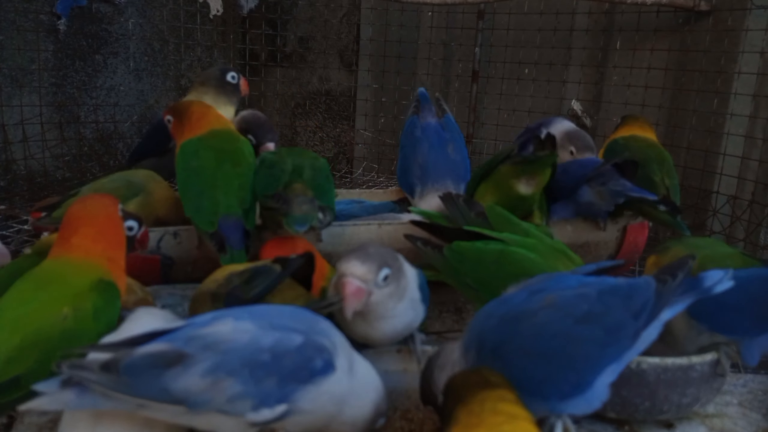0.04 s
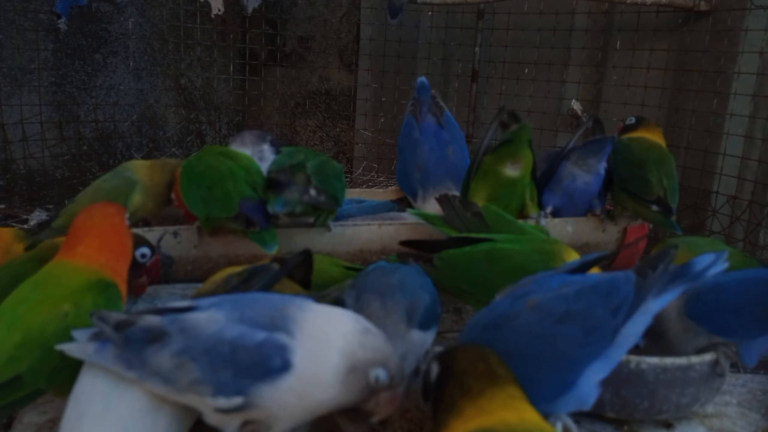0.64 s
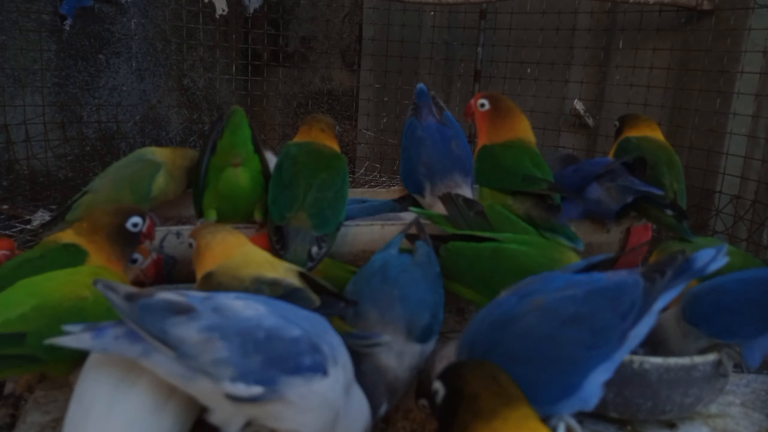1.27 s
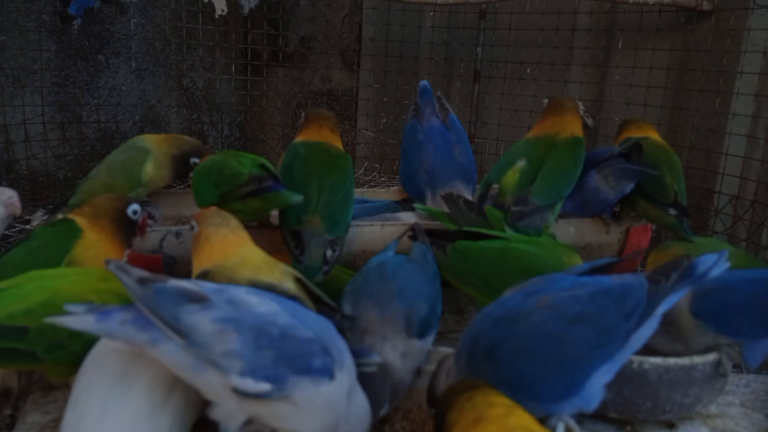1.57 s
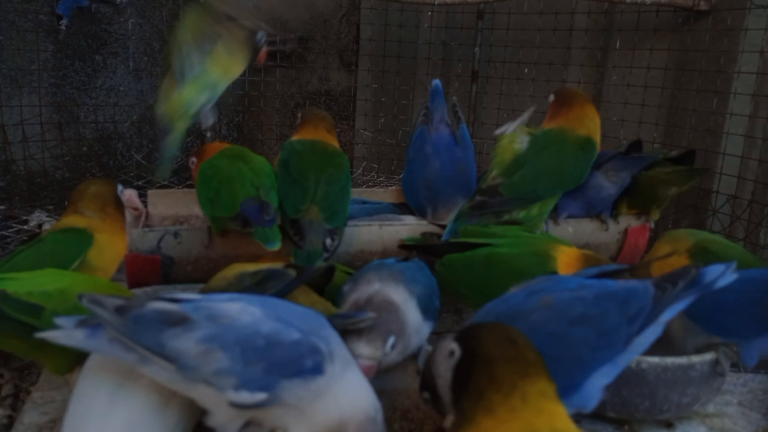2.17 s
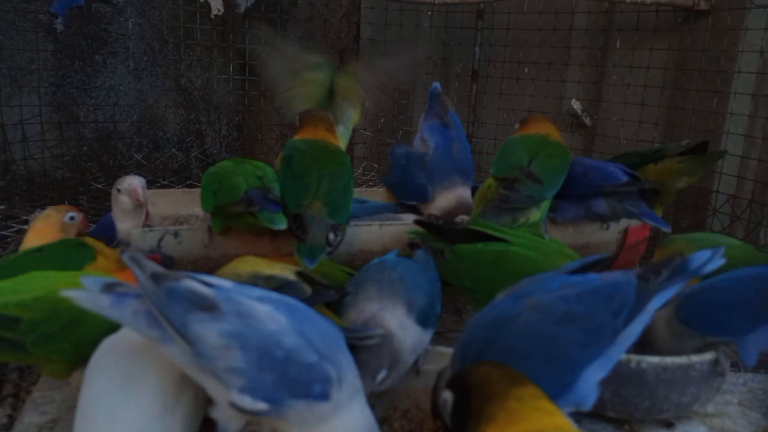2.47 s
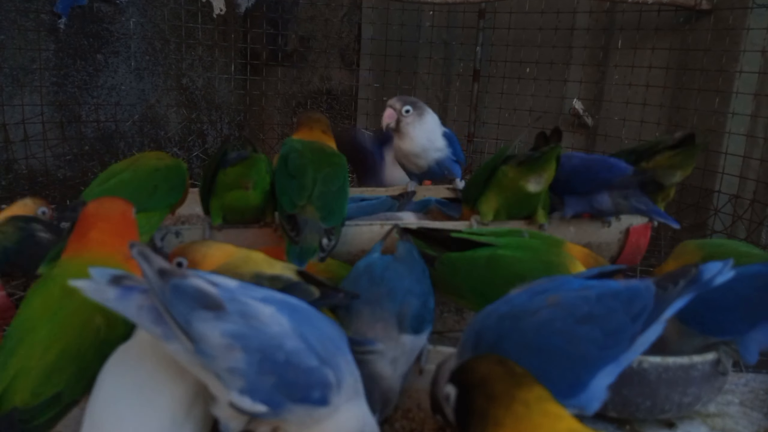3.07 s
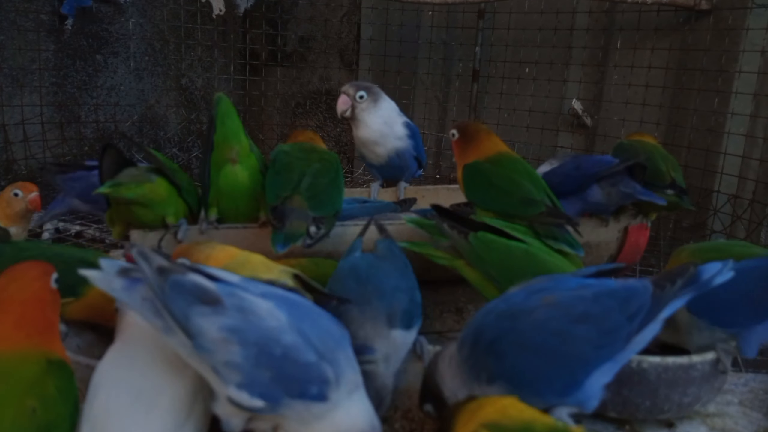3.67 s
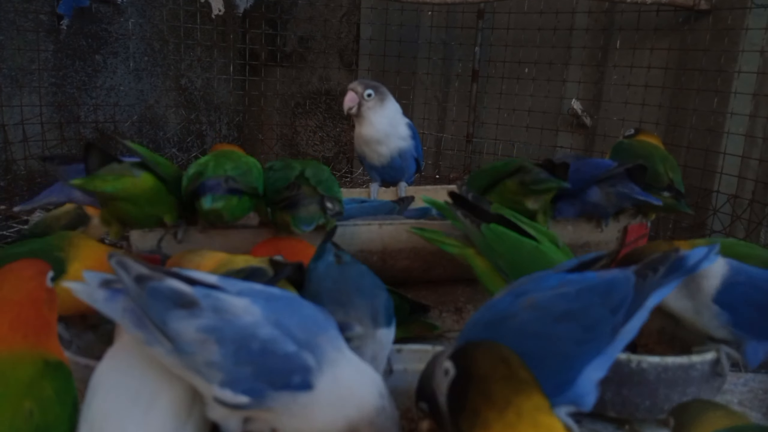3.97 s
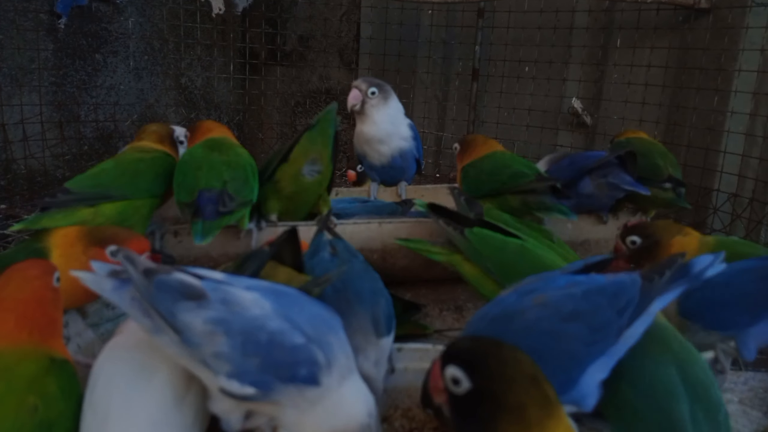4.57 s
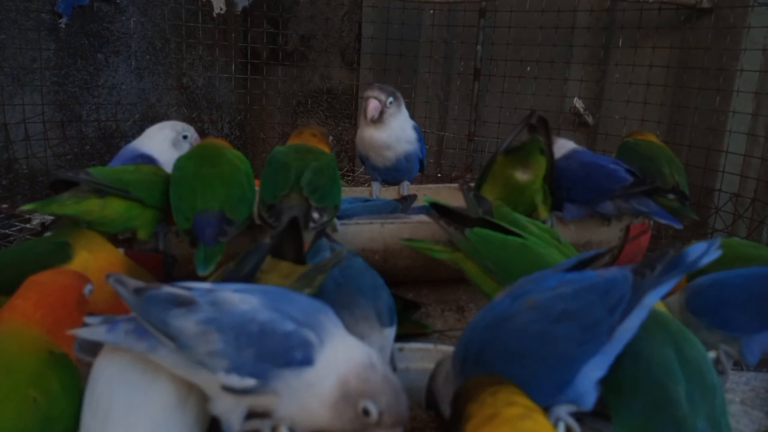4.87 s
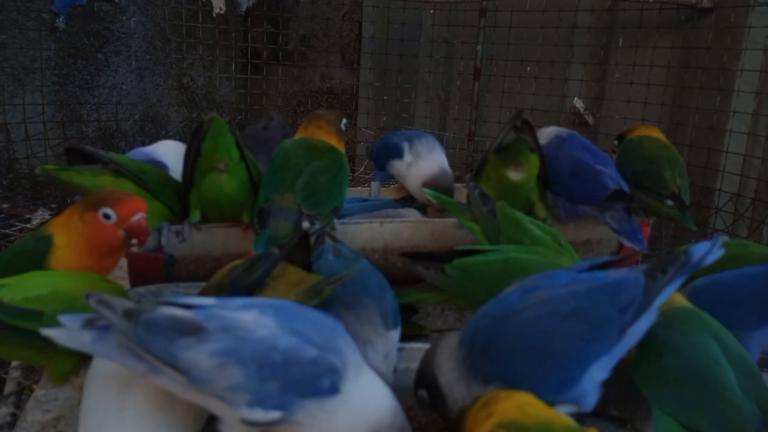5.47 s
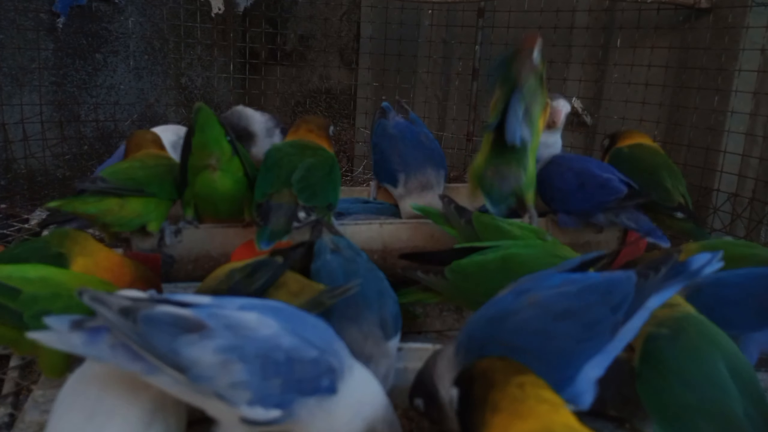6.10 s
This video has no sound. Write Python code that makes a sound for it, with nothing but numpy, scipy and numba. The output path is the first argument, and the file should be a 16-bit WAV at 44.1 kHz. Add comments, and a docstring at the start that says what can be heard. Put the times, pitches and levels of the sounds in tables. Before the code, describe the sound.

Close pecking, claw scrapes and dull knocks on a perch mix with the rustle and flutter of small parrots jostling at a feeder. A piercing, raspy shriek breaks out, followed by a quick rising chirp, a squawk and a softer chirp, then two more bursts of shrieking. The calls ring off the aviary walls and briefly overload the microphone. Behind them are a low steady hum and two faint, hoarse faraway calls.

```python
"""Feathers rustle, feet shuffle and wings push air as lovebirds feed close by, over a faint outdoor hum.
Beaks crack seed, claws scrape, perch and feeder knock. Three shrieking phrases, a lone squawk and two
rising chirps come from the syrinx, a harmonic stack that jumps between clean and rasping notes, and ring
off the walls of a small aviary. A dry, low crackle of microphone overload is added at four loud moments.
Another bird calls hoarsely, far off. A gain control ducks under each shriek."""
import sys
import numpy as np
from scipy import signal
from scipy.fft import rfft, irfft, next_fast_len
from scipy.io import wavfile
from scipy.ndimage import uniform_filter1d
from numba import njit

SR = 44100
rng = np.random.default_rng(int(sys.argv[2]) if len(sys.argv) > 2 else 0)


def persist_wave(psi):
    """Save psi, clipped to +-1, as 16-bit WAV."""
    counts = np.round(np.clip(psi, -1, 1) * 32767).astype(np.int16)
    wavfile.write(sys.argv[1], SR, np.atleast_2d(counts).T)


N = 279594
TIME = np.arange(N) / SR
TOP_HZ = 16200


def undb(db):
    """Decibels to gain."""
    return 10 ** (np.asarray(db) / 20)


def unit(x):
    """Scale to rms 1."""
    return x / np.sqrt(np.mean(x ** 2) + 1e-20)


def add(out, start_s, x):
    """Mix x into out from start_s."""
    i = int(start_s * SR)
    out[i:i + len(x)] += x[:N - i]


def spectrum_db(hz, points):
    """Read (Hz, dB) points on a log-frequency axis."""
    points_hz, db = np.transpose(points)
    return np.interp(np.log(hz + 1), np.log(points_hz), db)


def colour(x, points):
    """Filter by (Hz, dB) points; rms 1."""
    size = next_fast_len(len(x))
    gain = undb(spectrum_db(np.arange(size // 2 + 1) * SR / size, points))
    return unit(irfft(rfft(x, size) * gain, size)[:len(x)])


def band(x, low_hz, high_hz, order=2):
    """Causal band-pass."""
    sos = signal.butter(order, [low_hz, min(high_hz, SR / 2 - 100)], "band", fs=SR, output="sos")
    return signal.sosfilt(sos, x)


def wander(t, rate_hz):
    """Random values joined by lines."""
    steps = rng.standard_normal(4096)
    return np.interp(t * rate_hz, np.arange(len(steps)), steps)


def gate(t, length_s, edge_s):
    """Fade in from 0 and out from length_s, each over edge_s."""
    return np.sin(np.pi / 2 * np.clip(np.minimum(t, length_s + edge_s - t) / edge_s, 0, 1)) ** 2


def decay(t, t60_s):
    """Fall by 60 dB every t60_s."""
    return np.exp(-np.log(1000) * t / t60_s)


def grains(spread_db, size=N):
    """Noise of tiny contacts of very unequal strength."""
    noise = rng.standard_normal(N)
    strength = undb(spread_db * np.minimum(rng.exponential(size=N), 2 * np.pi))
    return unit(noise * strength)[:size]


def activity(calm_db, movements, attack_s=0.011, release_s=0.02):
    """Envelope of (start s, hold s, dB) movements above a calm level."""
    power = undb(calm_db) ** 2
    for start_s, hold_s, db in movements:
        t = TIME - start_s
        burst = np.clip(t / attack_s, 0, 1) * np.exp(-np.maximum(t - hold_s, 0) / release_s)
        power = power + (undb(db) * burst) ** 2
    return np.sqrt(power)


def cracks(count=260, spread_db=4.5, decay_s=0.012):
    """Envelope of small cracks: instant onset, fast decay; a few stand out."""
    kicks = np.zeros(N)
    for when, draw in rng.random((count, 2)):
        kicks[int(when * N)] += undb(spread_db * np.minimum(-np.log(draw), np.pi))
    return signal.lfilter([1], [1, -np.exp(-1 / (decay_s * SR))], kicks)


# Spectra of feathers and of feet. Each row: frequency in Hz, gain in dB.
FEATHER_SPECTRUM = [(1290, -83), (2200, 7.5), (3330, -0.5), (4000, 3.5), (4720, 2), (6640, -1), (9250, 4.5),
                    (11100, -1), (15000, -6.5), (16000, -27)]
FOOT_SPECTRUM = [(240, -21), (400, -17), (602, 2), (782, -0.5), (860, 6), (1100, 6.5), (1210, 0),
                 (1410, 6.5), (1800, -0.5), (3200, -5), (4160, -21), (7040, -120)]
# Birds jostling. Each row: start in seconds, hold in seconds, relative feather and foot levels in dB.
JOSTLES = [(0, 0.13, -44.5, -38), (0.16, 0.3, -45, -44), (1.602, 0.15, -57.5, -48),
           (1.88, 0.15, -46.5, -38.5), (2.18, 0.073, -46, -52), (2.425, 0.25, -45, -43.5),
           (2.769, 0.074, -41.5, -46.5), (2.974, 0.042, -34, -39), (3.087, 0.057, -43.5, -40.5),
           (3.591, 0.066, -40, -43.5), (4.049, 0.083, -45.5, -46.5), (4.266, 0.065, -46, -48),
           (4.671, 0.049, -42, -38.5), (4.819, .09, -44.5, -40.5), (5.25, .18, -46, -39.5),
           (5.454, 0.046, -43, -49.5), (5.838, 0.19, -42, -41.5), (6.16, 0.22, -53.5, -46.5)]


def jostling(gain_db=-2, calm_feathers_db=-54, calm_feet_db=-50, surge_db=5.5, husks=0.79, steps=0.41):
    """Husks crack over rustling feathers and shuffling feet, which surge together."""
    surge = undb(surge_db * wander(TIME, 45))
    feathers = unit(colour(grains(3.6), FEATHER_SPECTRUM) * (surge + husks * cracks()))
    feet = unit(colour(grains(3.33), FOOT_SPECTRUM) * (surge + steps * cracks()))
    rustling = activity(calm_feathers_db, [(start_s, hold_s, db) for start_s, hold_s, db, _ in JOSTLES])
    stepping = activity(calm_feet_db, [(start_s, hold_s, db) for start_s, hold_s, _, db in JOSTLES])
    return undb(gain_db) * (rustling * feathers + stepping * feet)


# Spectrum of air pushed by wings. Each row: frequency in Hz, gain in dB.
DRAUGHT_SPECTRUM = [(18, -43), (30, -13), (81, 1.5), (165, -2.5), (231, -10.5), (392, -8), (523, -12),
                    (600, -8.5), (780, -50), (1320, -120)]
# Take-offs and landings. Each row: start in seconds, hold in seconds, relative level in dB.
FLAPS = [(-.02, .4, -41.5), (1.6, 0.8, -45.5), (2.8, .06, -36), (4.85, 0.273, -45), (5.86, 0.15, -39)]


def wing_draught(gain_db=-3, calm_db=-49.5, gust_db=5.5):
    """Wings push air in low gusts."""
    air = colour(rng.standard_normal(N), DRAUGHT_SPECTRUM)
    gusts = unit(air * undb(gust_db * wander(TIME, 30)))
    return undb(gain_db) * activity(calm_db, FLAPS) * gusts


# Spectrum of the outdoor hum. Each row: frequency in Hz, gain in dB.
HUM_SPECTRUM = [(18, -36), (30, -55), (70, -3), (153, 4.5), (336, -4.5), (780, -4), (1070, -3.5),
                (1220, -8), (1430, -2.5), (3770, -18.5), (7670, -24), (9460, -10.5), (14800, -49),
                (16000, -25)]
# Drone outside. Each row: pitch in Hz, level in dB.
DRONE_TONES = [(168, -61), (266, -60.5)]


def outdoor_hum(level_db=-51, waver=0.011, swell_db=3.5):
    """Low noise with a faint wavering drone in it."""
    hum = colour(rng.standard_normal(N), HUM_SPECTRUM) * undb(level_db + wander(TIME, 3.57))
    for hz, db in DRONE_TONES:
        phase = 2 * np.pi * np.cumsum(hz * (1 + waver * wander(TIME, 12))) / SR
        hum += undb(db + swell_db * wander(TIME, 2.79)) * np.sin(phase)
    return hum


# Pecks. Each row: start in seconds, relative level in dB, relative body level in dB, T60 in seconds.
BEAK_PECKS = [(.0678, -26.5, -1.5, .07), (0.2094, -30, -16, 0.043), (.631, -33.5, 7.5, 0.049),
              (.7324, -25.5, -20, 0.012), (1.4436, -39, 1, 0.036), (1.6974, -38, 13.5, 0.2),
              (1.7723, -32, 7.5, 0.069), (2.334, -32.5, -16, 0.1), (2.4056, -32, 11.5, 0.068),
              (2.6101, -22, 2.5, 0.056), (4.0424, -44, 9, 0.05), (4.1904, -46.5, 17.5, 0.075),
              (4.3776, -26.5, -19, 0.022), (4.547, -34.5, 0, 0.017), (4.9873, -37, 8, 0.025)]


def pecks(gain_db=-7, body_gain_db=-4):
    """A beak hits seed or trough: a sharp crack with a woody body."""
    out, t = np.zeros(N), TIME[:SR // 4]
    for start_s, db, body_db, t60_s in BEAK_PECKS:
        crack = unit(band(grains(3, size=len(t)), 2500, 12000, order=1))
        body = undb(body_db + body_gain_db) * unit(band(rng.standard_normal(len(t)), 980, 2500))
        add(out, start_s, undb(db + gain_db) * (crack + body) * decay(t, t60_s))
    return out


# Spectrum of a scrape. Each row: frequency in Hz, gain in dB.
SCRAPE_SPECTRUM = [(290, -34), (500, -6), (868, -10), (1190, -3), (1400, 10), (1570, 1.5), (3860, 0),
                   (4730, -6), (9490, -1.5), (16000, -25)]
# Scrapes. Each row: start in seconds, fade time in seconds, level in dB, tilt in dB per octave.
CLAW_SCRAPES = [(0.401, 0.025, -39, -2.5), (2.803, 0.02, -40, 1.5), (3.81, 0.018, -43.5, -2.5),
                (4.684, 0.036, -38, 1), (5.229, .016, -36, 1.5), (5.317, 0.054, -38.5, 1),
                (6.081, 0.039, -31.5, 5)]


def scrapes(attack_s=0.0015, flicker_db=1.5):
    """Claws and wing tips drag grittily over wood and wire."""
    out, t = np.zeros(N), TIME[:SR // 4]
    for start_s, fade_s, db, tilt_db in CLAW_SCRAPES:
        tilted = [(hz, gain_db + tilt_db * np.log2(hz)) for hz, gain_db in SCRAPE_SPECTRUM]
        grit = colour(grains(2.5, size=len(t)), tilted) * undb(flicker_db * wander(t, 250))
        envelope = (1 - np.exp(-t / attack_s)) * np.exp(-(t / fade_s) ** 2 / 2)
        add(out, start_s, undb(db) * grit * envelope)
    return out


# Response of throat and beak. Each row: frequency in Hz, gain in dB.
VOICE_SPECTRUM = [(900, -87), (1500, -9), (2200, 2.5), (3200, 3.5), (6500, 2.5), (9500, 6.5), (12000, -2.5),
                  (14000, -15), (16000, -24)]


def syrinx(hz, rasp, throat_hz, tilt_db, throat_db=10, throat_octaves=0.39, swell_db=4, edge_s=0.0014):
    """Harmonic stack, tilted per octave; rasp scatters pitch and strength and weakens alternate cycles."""
    t = TIME[:len(hz)]
    jitter = rasp * (0.0935 * wander(t, 900) + 0.06 * wander(t, 250))
    phase = 2 * np.pi * np.cumsum(hz * (1 + jitter)) / SR
    k = np.arange(1, 12)[:, None]
    octaves = np.log2(k * hz / throat_hz)
    resonance_db = throat_db * np.exp(-(octaves / throat_octaves) ** 2)
    harmonics_db = spectrum_db(k * hz, VOICE_SPECTRUM) + tilt_db * octaves + resonance_db
    tone = unit(np.sum(undb(harmonics_db) * (k * hz < TOP_HZ) * np.sin(k * phase), axis=0))
    shimmer = wander(t, 677)
    subharmonic = 0.49 * wander(t, 274) * np.cos(phase / 2)
    tone *= 1 + rasp * (shimmer + subharmonic)
    puffs = rng.standard_normal(SR)[:len(t)] * (1 + np.cos(phase))  # turbulent air, once a cycle
    air = 0.37 * rasp * colour(puffs, VOICE_SPECTRUM)
    flutter_db = 2 * wander(t, 183)
    pressure = undb(swell_db * np.sin(np.pi * t / t[-1]) + flutter_db)
    return unit((tone + air) * pressure) * gate(t, t[-1] - edge_s, edge_s)


# Notes of the shrieks and the lone squawk. Each row: start in seconds, length in seconds, start pitch
# in Hz, target pitch in Hz, relative level in dB, rasp from 0 to 1, throat resonance in Hz.
SHRIEK_NOTES = [ (0.965, 0.045, 1580, 1599, -20, 0.14, 6100), (.997, 0.041, 2456, 3040, -18, 0.31, 6600),
                (1.025, 0.02, 2278, 2193, -14.5, 0.64, 5700), (1.055, 0.038, 2126, 2073, -22.5, 0.14, 2170),
                (1.079, .028, 1640, 1820, -14.5, 0.22, 7500), (1.104, 0.036, 2602, 3100, -11.5, 0.25, 3540),
                (1.129, 0.017, 2390, 2222, -8, 0.82, 4470), (1.151, 0.04, 2165, 2185, -14, 0.97, 6250),
                (1.181, 0.037, 2410, 3262, -14.5, 0, 10300), (1.185, 0.037, 1725, 1533, -10.5, 0.49, 4730),
                (1.216, 0.015, 2276, 2080, -9, 0.32, 7600), (1.243, .054, 4350, 4395, -13, 0.28, 4160),
                (1.295, .024, 4080, 2490, -20.5, 0.5, 3500), (1.932, 0.02, 2075, 1986, -27.5, 0.97, 8200),
                (3.234, .017, 1735, 1837, -20, 0.92, 6560), (3.263, 0.019, 6600, 5600, -14, 0.38, 6400),
                (3.285, 0.035, 1720, 2200, -24, 0.57, 6560), (3.312, 0.039, 3370, 3282, -16, .16, 3270),
                (3.342, .013, 1814, 1856, -14.5, 0.4, 5360), (3.354, 0.017, 3350, 2037, -17.5, 0.45, 3000),
                (3.374, 0.029, 2335, 2544, -17, 0.22, 7400), (3.394, 0.02, 2157, 2200, -13, 0.83, 5270),
                (3.451, 0.012, 1930, 2950, -13, 0.3, 4370), (3.46, 0.024, 3020, 2885, -12, 0.24, 6700),
                (3.481, 0.0095, 2070, 2130, -15, 0.81, 5100), (3.491, 0.025, 3870, 3830, -14.5, 0.21, 3900),
                (3.518, 0.026, 4560, 4874, -10.5, 0.2, 4830), (5.612, 0.031, 2890, 2363, -21.5, 0.55, 3700),
                (5.636, 0.033, 2870, 3060, -18, 0.6, 5900), (5.665, 0.03, 1675, 1329, -6.5, 0.66, 5240),
                (5.677, 0.022, 4126, 3797, -8, 0.02, 3970), (5.705, 0.032, 2203, 2215, -15.5, 0.6, 6260),
                (5.712, 0.025, 2056, 3013, -19, 0.43, 2700), (5.732, 0.04, 3963, 4030, -13, 0.16, 4000),
                (5.771, 0.026, 3870, 3886, -12, 0.28, 3930), (5.792, .014, 2820, 2835, -19.5, 0.73, 5600),
                (5.801, 0.016, 4260, 4280, -7.5, 0.28, 4200)]


def shrieks(gain_db=3, settle_rate=3, attack_s=0.0028, usual_db=-11.5, usual_throat_hz=4860):
    """Chains of notes: each builds up in the syrinx, is brightest midway and settles on its pitch."""
    out = np.zeros(N)
    for start_s, length_s, start_hz, target_hz, db, rasp, throat_hz in SHRIEK_NOTES:
        progress = np.linspace(0, 1, int(length_s * SR))
        hz = start_hz + (target_hz - start_hz) * np.expm1(-settle_rate * progress) / np.expm1(-settle_rate)
        # Louder is brighter; a tighter throat lifts one high harmonic and dulls the rest.
        tilt_db = -1 + 0.57 * (db - usual_db) - 3 * np.log2(throat_hz / usual_throat_hz)
        bloom_db = 4 * (np.sin(np.pi * progress) - 0.75)
        onset = 1 - np.exp(-TIME[:len(hz)] / attack_s)
        note = syrinx(hz, rasp, throat_hz, tilt_db + bloom_db) * onset
        low_cut_hz = hz.min() * (0.86 + 0.47 * rasp)  # rasp thins the fundamental
        note = band(np.pad(note, (0, 256)), low_cut_hz, 14600, order=6)
        add(out, start_s, undb(db + gain_db) * note)
    return out


# Overload crackles. Each row: start in seconds, length in seconds, level in dB.
LOW_CRACKLES = [(1.108, 0.036, -32.5), (1.206, 0.021, -25.5), (3.396, 0.0046, -18), (5.666, 0.023, -17)]


def crackle():
    """Microphone overload: a brief, uneven low sputter, placed at the height of the shrieks."""
    out, t = np.zeros(N), TIME[:SR // 16]
    for start_s, length_s, db in LOW_CRACKLES:
        grit = grains(11.4, size=len(t)) * gate(t, length_s, edge_s=0.0008)
        sputter = band(grit, 37, 230, order=1) + 0.072 * band(grit, 200, 2600)
        add(out, start_s, undb(db) * unit(sputter) * np.sqrt(length_s / t[-1]))
    return out


# Knocks. Each row: start in seconds, pitch in Hz, level in dB, T60 in seconds.
PERCH_KNOCKS = [(1.442, 1140, -23, 0.012), (2.83, 165, -37, 0.13), (3.949, 1300, -21.5, 0.01),
                (4.981, 993, -32, 0.035), (5.901, 550, -15.5, 0.021), (5.953, 494, -22.5, 0.05)]


def knocks(attack_s=0.00061):
    """Perch and feeder knock dully, one damped mode each time."""
    out, t = np.zeros(N), TIME[:SR // 4]
    for start_s, hz, db, t60_s in PERCH_KNOCKS:
        envelope = (1 - np.exp(-t / attack_s)) * decay(t, t60_s)
        add(out, start_s, undb(db) * np.sin(2 * np.pi * hz * t) * envelope)
    return out


# Chirps. Each row: start in seconds, length in seconds, start pitch in Hz, end pitch in Hz,
# relative level in dB, tilt in dB per octave.
RISING_CHIRPS = [(1.798, .049, 2930, 4643, -22, 3), (2.69, 0.038, 3680, 5500, -32, 1)]


def chirps(gain_db=3, curve=1.7, rise_db=9, brighten_db=10):
    """The syrinx sweeps upwards, ever faster, louder and brighter."""
    out = np.zeros(N)
    for start_s, length_s, start_hz, end_hz, db, tilt_db in RISING_CHIRPS:
        effort = np.linspace(0, 1, int(length_s * SR)) ** curve
        hz = start_hz + (end_hz - start_hz) * effort
        chirp = syrinx(hz, rasp=0.403, throat_hz=3650, tilt_db=tilt_db + brighten_db * (effort - 0.5))
        add(out, start_s, undb(db + gain_db + rise_db * (effort - 0.5)) * chirp)
    return out


# Far calls. Each row: cue in seconds, length in seconds, start pitch in Hz, end pitch in Hz, level in dB.
DISTANT_CALLS = [(3.005, 0.171, 566.6, 548, -43), (4.485, 0.216, 561.4, 538, -43.5)]
# Their harmonics, fundamental first. Each entry: relative level in dB.
DISTANT_HARMONICS_DB = [3.5, 1.5, -1]


def far_bird(hoarseness=0.0335, waver=0.028, haze_share=0.81, lead_s=0.03):
    """Only a few wavering harmonics survive the distance, in a diffuse haze."""
    out, t = np.zeros(N), TIME[:SR // 2]
    for cue_s, length_s, start_hz, end_hz, db in DISTANT_CALLS:
        glide_hz = np.interp(t, [0, length_s], [start_hz, end_hz])
        hz = glide_hz * (1 + hoarseness * wander(t, 302) + waver * wander(t, 25.3))
        phase = 2 * np.pi * np.cumsum(hz) / SR
        tone = sum(undb(harmonic_db + wander(t, 32)) * np.sin(k * phase)
                   for k, harmonic_db in enumerate(DISTANT_HARMONICS_DB, 1))
        haze = haze_share * unit(band(rng.standard_normal(len(t)), 590, 1460))
        add(out, cue_s - lead_s, undb(db) * (unit(tone) + haze) * gate(t, length_s, edge_s=0.07))
    return out


def aviary(x, early_db=-4, early_decay_s=0.014, tail_db=-16, mid_t60_s=0.34, treble_t60_s=0.2):
    """Trough and near walls scatter quick echoes; the shed rings on behind them."""
    echoes, t = np.zeros(SR), TIME[:SR]
    for delay_s, strength in zip(rng.uniform(0.003, 0.045, 60), rng.standard_normal(60)):
        echoes[int(delay_s * SR)] += strength * np.exp(-delay_s / early_decay_s)
    noise = rng.standard_normal(SR)
    mids = band(noise, 216, 4700) * decay(t, mid_t60_s)
    treble = band(noise[::-1], 2800, 10500) * decay(t, treble_t60_s)
    tail = (mids + treble) * (1 - np.exp(-t / 0.034))
    response = (undb(early_db) * unit(echoes) + undb(tail_db) * unit(tail)) / np.sqrt(SR)
    return x + signal.fftconvolve(x, response)[:N]


def scene():
    """Calls and feeding echo in the aviary; crackle, movement and hum stay dry. Mono."""
    echoing = aviary(shrieks() + chirps() + pecks() + scrapes() + knocks() + far_bird())
    return (echoing + crackle() + jostling() + wing_draught() + outdoor_hum())[None]


@njit
def follow(power, attack_s, release_s):
    """One-pole envelope with separate rise and fall times."""
    out, level = np.empty(len(power)), 0.
    for i in range(len(power)):
        time_s = attack_s if power[i] > level else release_s
        level += (power[i] - level) / (time_s * SR)
        out[i] = level
    return out


def record(dry, knee_db=-23, attack_s=0.045, release_s=0.05, ceiling=0.58, low_cut_hz=50):
    """Two-to-one gain control, rounded peaks, a bass cut and a steep top cut."""
    power = follow(uniform_filter1d(dry[0] ** 2, size=64), attack_s, release_s)
    over_knee = np.maximum(np.sqrt(np.abs(power)) / undb(knee_db), 1)
    ducked = dry / np.sqrt(over_knee)
    rounded = ducked / (1 + (ducked / ceiling) ** 8) ** (1 / 8)
    top_cut = signal.ellip(8, 0.2, 70, TOP_HZ, fs=SR, output="sos")
    return signal.sosfilt(top_cut, band(rounded, low_cut_hz, SR / 2))


dry = scene()
out = record(dry)
persist_wave(out)
```